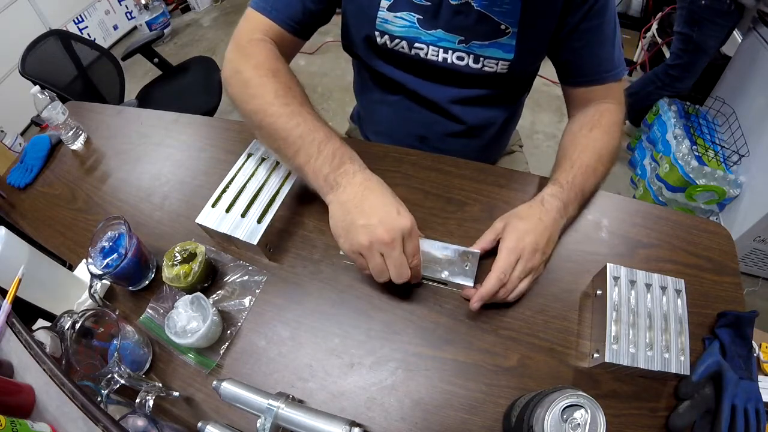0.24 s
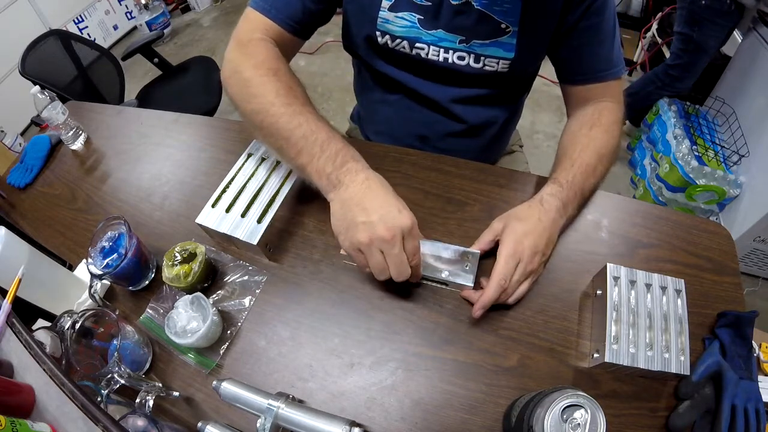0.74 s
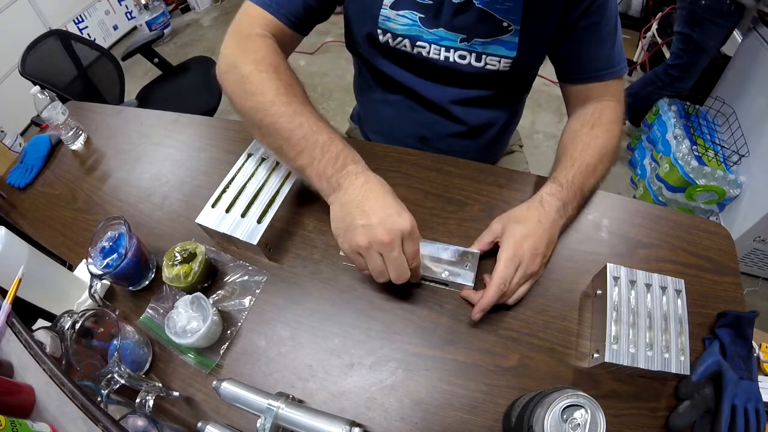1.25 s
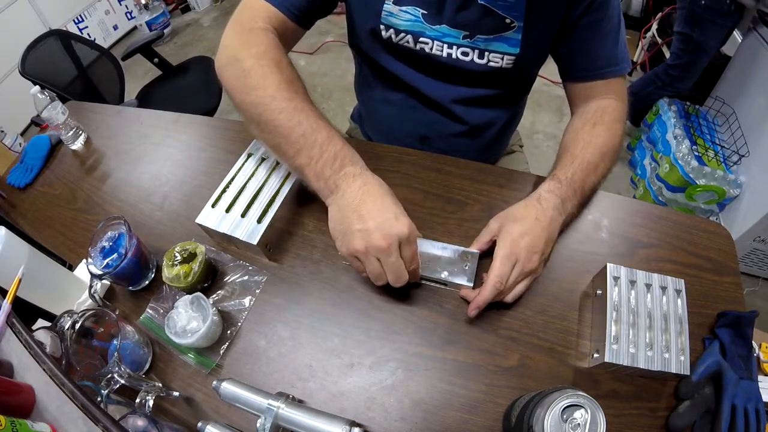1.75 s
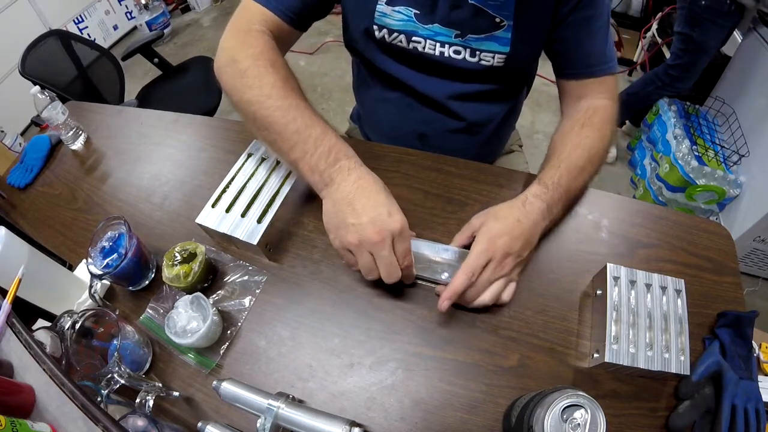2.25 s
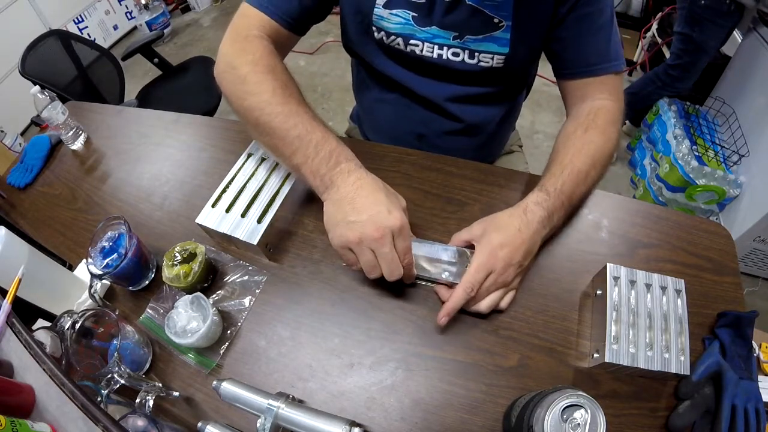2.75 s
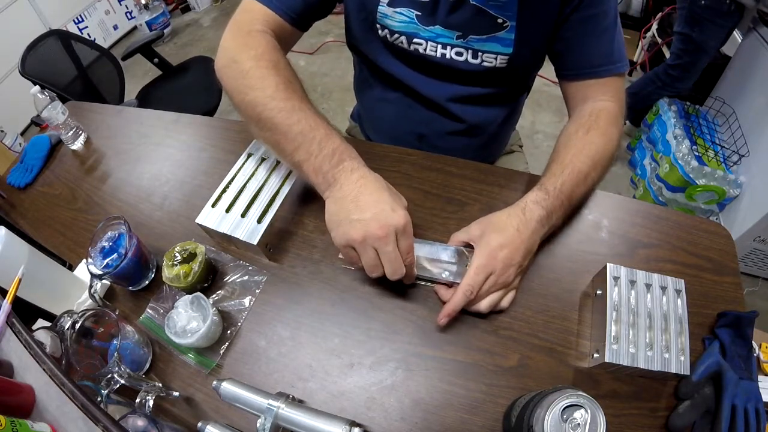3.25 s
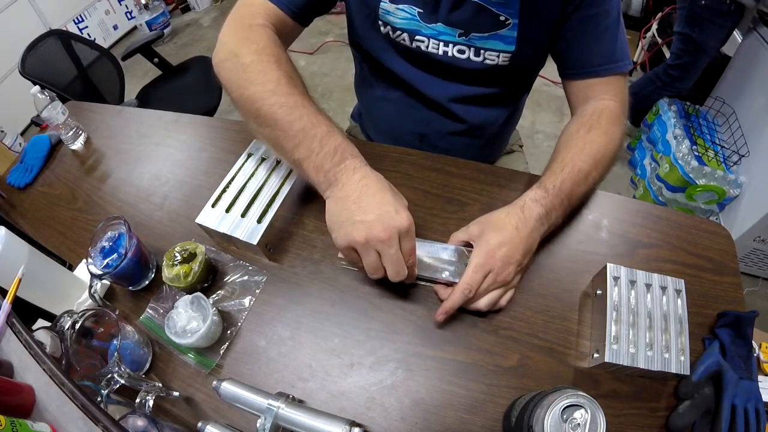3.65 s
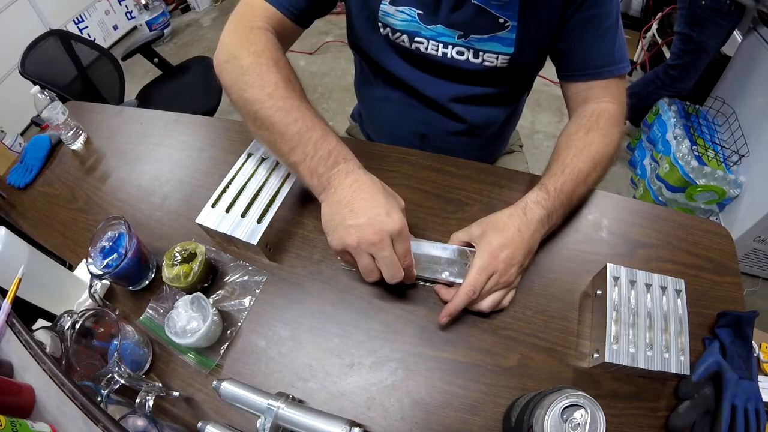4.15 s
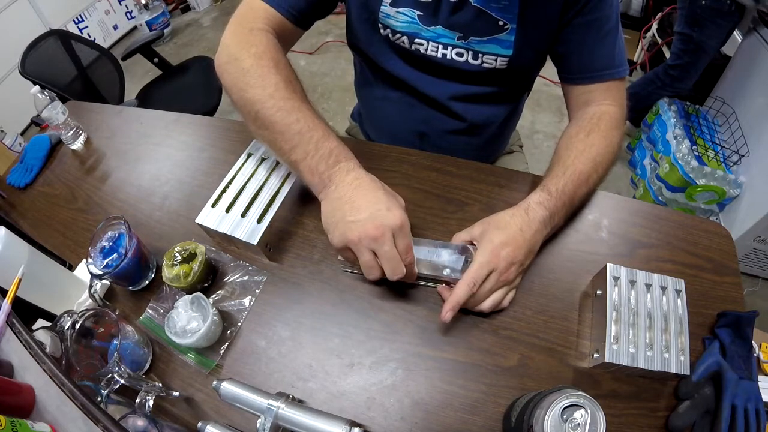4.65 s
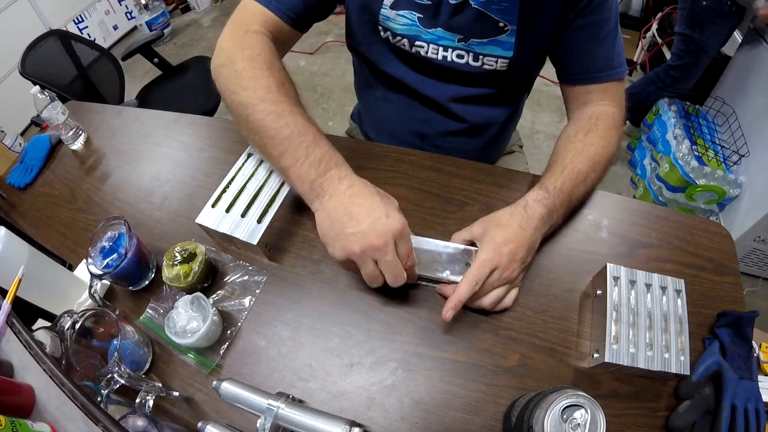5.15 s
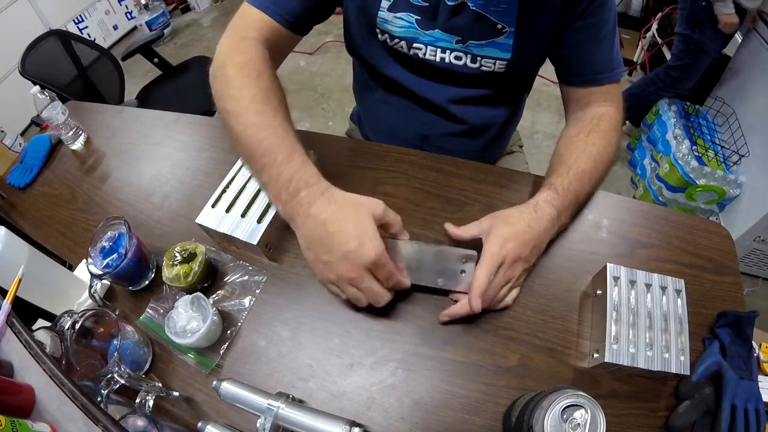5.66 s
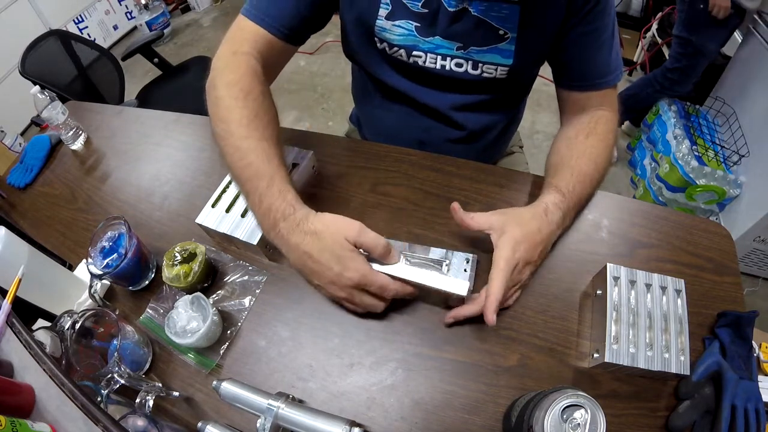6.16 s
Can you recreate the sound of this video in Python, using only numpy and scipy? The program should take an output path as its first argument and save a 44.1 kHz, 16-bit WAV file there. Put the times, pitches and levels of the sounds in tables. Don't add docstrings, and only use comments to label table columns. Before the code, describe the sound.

A close microphone in a workroom picks up a two-piece metal mold being worked apart by hand on a hollow table. Low ventilation rumble and faint hiss run throughout. Weak knocks at 0.1 and 0.25 s lead to a hard ringing double blow at 0.8 s, a softer one at 1.0, a hard knock at 1.3, a fainter one with a ping at 1.6, and a strong clacking bounce at 1.9. From 2.3 to 3.2 s there are mostly light taps, soft thumps and rubbing, with a moderate double knock near 2.8. Hard blows return at 3.3, 4.35-4.45, 5.0 and a bright one at 5.24, with small taps between. The loudest, ringing metallic blow lands at 5.75 s with a faint bounce. Each knock is hollow and brief, with a short room tail. Afterwards ventilation and barely audible rubbing remain until about 6.4 s.

```python
import sys
import numpy as np
from scipy import signal
from scipy.fft import rfft, irfft
from scipy.io import wavfile
from scipy.ndimage import uniform_filter1d

SR = 44100
rng = np.random.default_rng(int(sys.argv[2]) if len(sys.argv) > 2 else 0)


def bounce(signal):
    frames = np.transpose(np.atleast_2d(signal))
    limited = np.clip(frames, -1, 1)
    pcm = np.round(limited * 32767).astype(np.int16)
    wavfile.write(sys.argv[1], SR, pcm)


def invert_db(level):
    return 10 ** (np.asarray(level, dtype=float) / 20)


N = 283122


def evened(x):
    return x / np.sqrt(np.mean(x ** 2) + 1e-20)


def read(points, hz):
    f, value = np.transpose(points)
    return np.interp(np.log(hz + 1), np.log(f + 1), value)


def add(mix, s, sound):
    part = mix[round(s * SR):][:len(sound)]
    part += sound[:len(part)]


def ring(modes, spread, rise):
    t = np.arange(SR // 5) / SR
    hz, db, t60 = np.transpose(modes)[:, :, None]
    luck_db, luck_hz = rng.standard_normal((2, len(modes), 1))
    fade = invert_db(db + 1.5 * luck_db - 60 * t / t60)
    waves = fade * np.sin(2 * np.pi * hz * (1 + spread * luck_hz) * t)
    sound = waves.sum(0) * (1 - np.exp(-t / rise))
    return sound / abs(sound).max()


# (f/Hz, level/dB, t60/s)
LOW_MODES = [(266, -9.5, 0.059), (369, -6.5, 0.061), (432, 2.5, 0.061), (500, -1, 0.097), (553.3, 3, 0.039)]
MIDDLE_MODES = [(639, 0.5, 0.049), (700.3, 2, 0.037), (923, -6, 0.071), (971, -1.5, 0.059),
                (1060, 4.5, 0.044), (1118, -5.5, 0.058), (1217, 1, 0.052), (1325, -7, 0.039)]
HIGH_MODES = [(1451, -21.5, 0.045), (1536, -6, 0.031), (1730, -24, 0.025)]


def knock(swell_db, hz, low_db, middle_db, high_db):
    t = np.arange(SR // 5) / SR
    rise_s, steepness = 0.0019, 5.48
    u = t / rise_s
    build = (u / steepness) ** steepness * np.exp(steepness - u)
    lead = invert_db(-10.5) * np.exp(-t / 0.0026) * np.sin(2 * np.pi * 0.885 * hz * t)
    housing = invert_db(swell_db) * (build * np.sin(2 * np.pi * hz * t) + lead)
    low = invert_db(low_db) * ring(LOW_MODES, spread=0.012, rise=0.002)
    middle = invert_db(middle_db) * ring(MIDDLE_MODES, spread=0.006, rise=0.0025)
    high = invert_db(high_db) * ring(HIGH_MODES, spread=0.005, rise=0.002)
    splash = (low + middle + 0.23 * high + 0.95 * housing) * np.exp(-140 * t)
    return low + middle + high + housing, splash


# (t/s, late swell level/dB, low modes level/dB, middle modes level/dB, high modes level/dB)
BLOWS = [(0.125, -31.5, -26.5, -33, -40), (0.258, -15.5, -21.5, -22, -34), (0.811, -8.5, -12.5, -7, -13),
         (0.84, -7.5, -10, -9.5, -20.5), (1.015, -17, -23.5, -17.5, -41), (1.291, -12.5, -10, -5, -12.5),
         (1.575, -31, -27.5, -24.5, -29), (1.767, -12, -18.5, -15.5, -37), (1.799, -19, -19, -22, -49),
         (1.938, -12, -6, -2.5, -10.5), (2.325, -28, -21, -28, -36), (2.598, -26.5, -28.5, -24.5, -32),
         (2.772, -10, -13.5, -14, -25), (2.783, -15.5, -48, -17.5, -35), (3.289, -9, -13, -7.5, -12),
         (3.456, -23, -17.5, -25.5, -28), (3.536, -41, -37, -29, -47), (3.953, -17, -18, -19, -30),
         (4.097, -39, -29.5, -28.5, -41), (4.355, -19, -7, -6.5, -24), (4.432, -15.5, -14, -14, -24),
         (4.985, -9.5, -13, -12, -28), (5.236, -23, -10, -3.5, -2), (5.744, -12, -5, -1.5, -11)]
BOUNCES = [
    (1.302, -20, -22, -20, -34),
    (1.949, -37, -19, -10.5, -40),
    (1.9683, -24, -13.5, -18, -30),
    (3.3033, -14, -21, -21, -34),
    (4.3601, -23, -18, -25, -13.5),
    (4.3713, -17.5, -18, -21, -34),
    (5.2455, -15, -33, -23, -27),
    (5.2744, -31, -35, -16, -40),
    (5.8081, -35, -30, -22, -40),
]
# (t/s, late swell level/dB, swell f/Hz, table level/dB)
TAPS = [(1.001, -15.5, 791, -23), (1.228, -15.5, 788, -22.5), (1.384, -35, 706, -30),
        (1.441, -27, 775, -28), (1.708, -31, 763, -35), (1.809, -19, 771, -22), (1.925, -20.5, 766, -25),
        (2.946, -26, 748, -26.5), (3.004, -32.5, 800, -31.5), (3.223, -24.5, 780, -27),
        (3.261, -24.5, 802, -26), (3.355, -28, 774, -42), (3.412, -20.5, 743, -27),
        (3.597, -27.5, 820, -25.5), (3.622, -19, 773, -20), (3.73, -35, 780, -47), (3.836, -28, 747, -40),
        (4.422, -14, 807, -19), (4.639, -10.5, 798, -16.5), (4.684, -21.5, 768, -22),
        (4.824, -26, 730, -25.5), (4.853, -23.5, 740, -25), (5.018, -24.5, 770, -40),
        (5.053, -23.5, 780, -35), (5.168, -10.5, 788, -23.5), (5.474, -28.5, 793, -38)]


def knocks():
    out = np.zeros((2, N))
    blow_hz = 768
    hits = [(s, swell_db, blow_hz, *table_db) for s, swell_db, *table_db in [*BLOWS, *BOUNCES]]
    hits += [(s, swell_db, hz, db, db - 4.5, db - 15) for s, swell_db, hz, db in TAPS]
    for s, *strength in hits:
        direct, splash = knock(*strength)
        add(out[0], s, direct)
        add(out[1], s, splash)
    return out


# (t/s, peak level/dB, f/Hz)
PINGS = [(.812, -31, 1260), (.812, -33, 3720), (.813, -29, 2830), (.842, -46, 3830), (.843, -9, 1040),
         (1.017, -22.5, 1276), (1.292, -34, 2980), (1.293, -30, 1217), (1.296, -41, 5370),
         (1.577, -42, 4190), (1.577, -47, 1900), (1.578, -24.5, 1270), (1.943, -35, 5190),
         (1.947, -36, 5380), (3.290, -15, 1185), (4.431, -29.5, 3700), (4.431, -24.5, 1800),
         (4.642, -41, 3675), (5.237, -16, 1110), (5.239, -41.5, 8400), (5.745, -25.5, 2830),
         (5.748, -35.5, 5330)]
# (t/s, peak level/dB, f/Hz, t60/s)
LINGERS = [
    (5.238, -20.5, 3950, 0.028),
    (1.577, -37, 2400, 0.027),
    (4.445, -47, 3750, .32),
    (5.249, -42, 4010, 0.28),
    (5.747, -8.5, 1078, .07),
    (5.77, -47, 4100, .2),
]
# (peak level/dB, f/Hz, t60/s)
TICK = [(-41, 6160, .015), (-41.5, 6850, 0.035), (-44, 8400, .0099), (-46, 8600, .01)]


def pings():
    out = np.zeros(N)
    grip_t60, tick_s = 0.039, 2.962
    rings = [(*row, grip_t60) for row in PINGS] + [*LINGERS] + [(tick_s, *row) for row in TICK]
    for s, db, hz, t60 in rings:
        pair = [(hz, 0, t60), (1.03 * hz, -8, t60)]
        add(out, s, invert_db(db) * ring(pair, spread=0.0023, rise=0.0013))
    return out


# (f/Hz, level/dB per Hz)
GRIT = [(1500, -37), (1900, 0), (3000, -0.5), (4200, -11.5), (5200, -16.5), (8000, -27), (12000, -46)]


def click(db, hz):
    t, f = np.arange(SR // 5) / SR, np.fft.rfftfreq(SR // 5, 1 / SR)
    colour = invert_db(read(GRIT, f) + 6.3 / (1 + ((f - hz) / 150) ** 2))
    grit = irfft(rfft(rng.standard_normal(len(t))) * colour)
    t60 = 0.044
    return invert_db(db - 60 * t / t60) * 0.41 * evened(grit) * (1 - np.exp(-t / 0.00072))


# (t/s, peak level/dB, strongest f/Hz)
CLICKS = [(0.2586, -35, 3060), (0.8115, -20.5, 2730), (0.841, -21.5, 2020), (1.0204, -36, 1970),
          (1.294, -20.5, 2800), (1.576, -25, 3100), (1.7674, -30, 2360), (1.939, -15, 2050),
          (1.9492, -12.5, 2210), (2.324, -41, 1860), (2.5984, -43, 2870), (2.773, -28.5, 1850),
          (3.2594, -35, 2570), (3.2903, -20, 1940), (3.457, -35, 2690), (3.954, -31.5, 1870),
          (4.3552, -19, 2000), (4.4326, -22.5, 1830), (4.6418, -32, 3660), (4.9866, -23.5, 1900),
          (5.171, -38, 2310), (5.2375, -14.5, 1940), (5.7443, -19, 2790)]


def clicks():
    out = np.zeros(N)
    for s, db, hz in CLICKS:
        add(out, s, click(db, hz))
    return out


# (t/s, peak level/dB, f/Hz)
THUMPS = [(0.319, -41, 142), (0.83, -36, 165), (1.003, -27, 78.5), (1.283, -25, 157), (1.798, -23.5, 156.4),
          (1.932, -26.5, 82), (2.181, -30, 112), (2.67, -45, 126), (2.772, -36, 105), (2.937, -37, 159),
          (3.279, -27, 160.4), (3.406, -33, 147), (3.531, -27, 67.5), (4.345, -23, 119), (4.901, -38, 117),
          (4.975, -31, 123.3), (5.226, -32, 166), (5.737, -25.5, 160)]


def thumps():
    out = np.zeros(N)
    t60 = 0.18
    for s, db, hz in THUMPS:
        pair = [(hz, 0, t60), (0.615 * hz, -4, t60)]
        add(out, s, invert_db(db) * ring(pair, spread=0.027, rise=0.0051))
    return out


# (t/s, level/dB)
SHUFFLE = [(0.0, -49), (0.21, -43), (0.62, -49.5), (0.84, -43), (1.55, -50.5), (1.93, -37), (2.63, -53),
           (2.93, -43), (3.25, -44.5), (3.47, -37.5), (4.25, -45.5), (4.43, -32), (4.58, -46), (4.76, -38),
           (5.1, -52), (5.5, -45.5), (5.9, -61), (6.42, -43)]


def shuffle():
    size = invert_db(3.5 * np.minimum(rng.exponential(1, N), 2))
    happens = rng.random(N) < 700 / SR
    grains = size * happens * rng.choice([-1, 1], N)
    rubbed = [*LOW_MODES, (836, -2, 0.038), (1108, -0.5, 0.055), (142.5, 9.0, 0.07)]
    body = ring(rubbed, spread=0.026, rise=0.00046)
    s, db = np.transpose(SHUFFLE)
    effort = invert_db(np.interp(np.arange(N) / SR, s, db) - 1.5)
    return effort * evened(signal.fftconvolve(grains, body)[:N])


# (f/Hz, t60/s)
ROOM = [(100, 1), (260, 0.39), (700, 0.38), (1840, 0.33), (4850, 0.2), (9000, .12)]


def room(x):
    out, turn = np.zeros(N), np.pi * np.arange(N) / SR * 1.3
    for k in range(3):
        echoes = np.zeros(SR // 2)
        at = np.arange(round(0.008 * SR), SR // 2 - 20, 20)
        bunches = evened(uniform_filter1d(rng.standard_normal(len(at)), 8))
        lumps = evened(invert_db(3.2 * bunches))
        echoes[at + rng.integers(0, 20, len(at))] = rng.choice([-1., 1.], len(at)) * lumps
        hz, t, z = signal.stft(echoes, SR, nperseg=256)
        fade = invert_db(-60 * t / read(ROOM, hz)[:, None])
        tail = signal.istft(z * fade, SR, nperseg=256)[1]
        level = np.sqrt(np.sum(invert_db(-120 * at / SR / 0.44)))
        feed = np.sqrt(2 / 3) * np.cos(turn + k * np.pi / 3)
        out += signal.fftconvolve(x * feed, tail / level)[:N]
    return invert_db(1) * out


# (f/Hz, level/dB per Hz)
AIR = [(13, -24), (22, 1.5), (86, -9), (206, -18), (243, -16), (420, -22), (830, -20.5), (952, -23.5),
       (1360, -26.5), (2280, -34), (2920, -32), (3530, -36.5), (4270, -42), (13100, -43), (15000, -61)]
# (f/Hz, width/Hz, lift level/dB)
HUMPS = [(820, 110, 1.5), (1448, 137, 9.5), (2967, 100, 12), (4246, 570, 9), (5786, 310, 9), (6870, 65, 9.5),
         (9360, 170, -9), (13200, 207, -1), (14650, 2000, 21)]


def air():
    frames, hz = N // 1024 + 5, np.fft.rfftfreq(4096, 1 / SR)
    a, b, patches = rng.standard_normal((3, 2049, frames))
    patches = evened(uniform_filter1d(uniform_filter1d(patches, 30, 0), 3, 1))
    humps = sum(db / (1 + (2 * (hz - f) / width) ** 2) for f, width, db in HUMPS)
    z = (a + 1j * b) * invert_db((read(AIR, hz) + humps)[:, None] + 0.77 * patches)
    return invert_db(-37.5) * evened(signal.istft(z, nperseg=4096, noverlap=3072)[1][:N])


def scene():
    direct, splash = knocks()
    sharp, rings = clicks(), pings()
    direct = direct + thumps() + sharp + rings
    splash = splash + invert_db(-3) * sharp + invert_db(-8) * rings
    return (direct + room(splash) + shuffle() + air())[None]


# (t/s, severity level/dB)
DROPOUTS = [(.034, 18), (.054, 18), (.264, 15), (.351, 8), (.65, 12), (1.488, 8), (1.953, 22), (2.528, 9),
            (3.229, 18), (3.423, 15), (3.724, 11), (4.319, 25), (4.363, 25), (4.704, 11), (4.832, 10),
            (5.578, 11), (5.722, 8), (6.091, 11), (6.26, 9), (6.301, 9)]


def thin_treble(x):
    hz, t, z = signal.stft(x, SR, nperseg=1024, noverlap=768)
    hz = hz[:, None]
    dropout_s = 0.02
    starved = sum(db * np.exp(-(2 * (t - s) / dropout_s - 1) ** 4) for s, db in DROPOUTS) / 4.3
    bar = np.interp(hz, [1500, 3000, 7000, 13000], [0, 0.3, 0.7, 0.9])
    bar = bar + starved * np.interp(hz, [1590, 3100, 12300, 12700], [0.056, 0.28, 0.54, 0.079])
    bar = np.where(hz > 13700, 2.1, bar)
    height = abs(z) / uniform_filter1d(abs(z), 21, 1)
    kept = 1 / (1 + (bar / height) ** 8)
    spare = uniform_filter1d(rng.standard_normal(len(t)), size=round(0.09 / t[1]))
    kept *= np.maximum(hz < 13700, spare > np.quantile(spare, 1 - 0.55))
    return signal.istft(z * kept, SR, nperseg=1024, noverlap=768)[1][:, :N]


def low_pass(x):
    return signal.sosfilt(signal.butter(12, 15150, fs=SR, output="sos"), x)


def record(dry):
    limit = 0.92
    limited = dry / (1 + (dry / limit) ** 6) ** (1 / 6)
    mix = thin_treble(limited)
    return low_pass(mix)


dry = scene()
out = record(dry)
bounce(out)
```